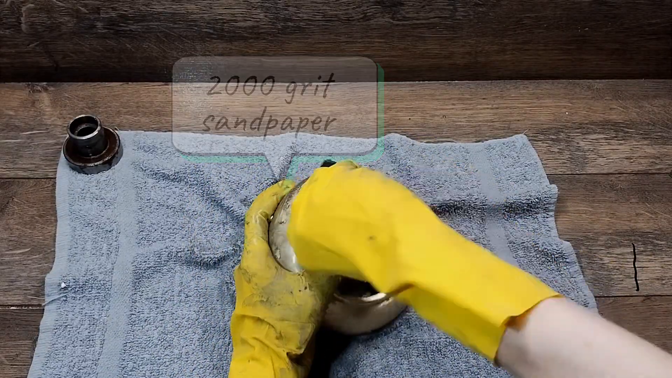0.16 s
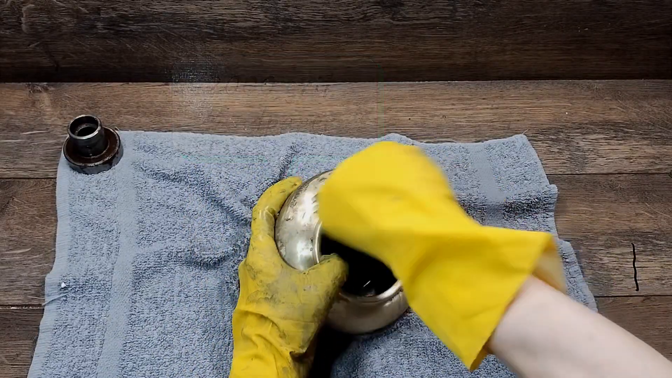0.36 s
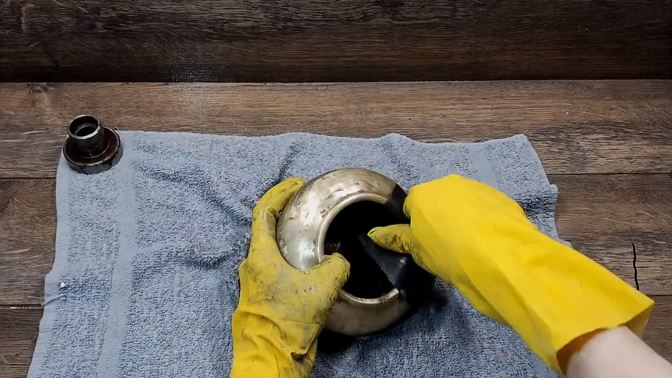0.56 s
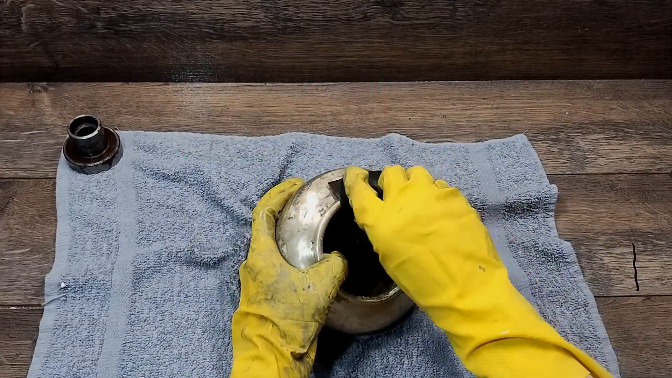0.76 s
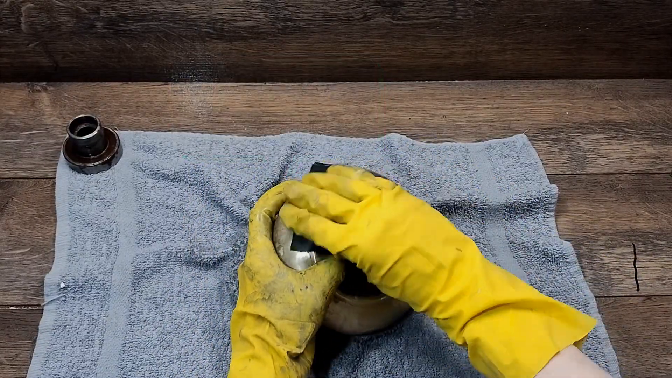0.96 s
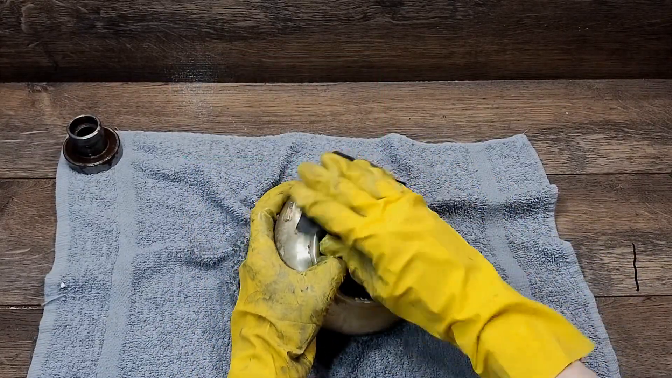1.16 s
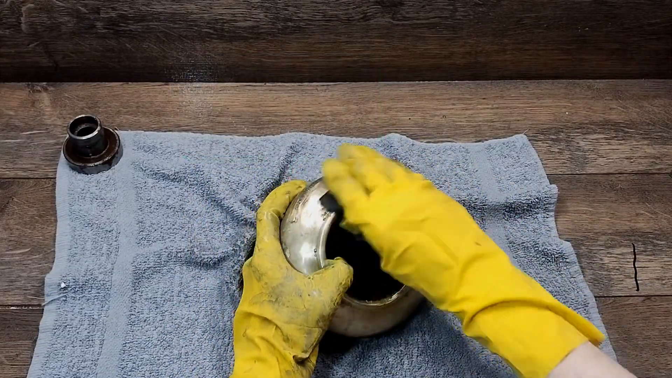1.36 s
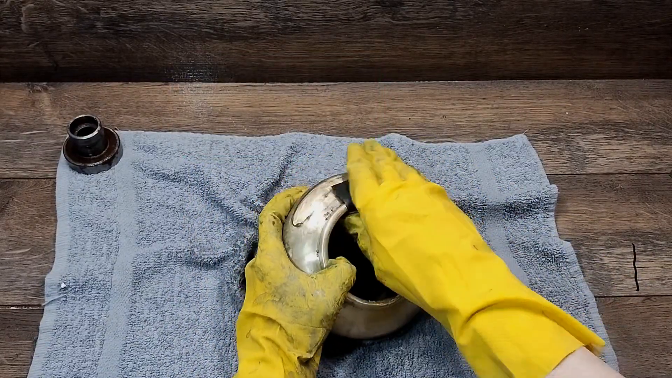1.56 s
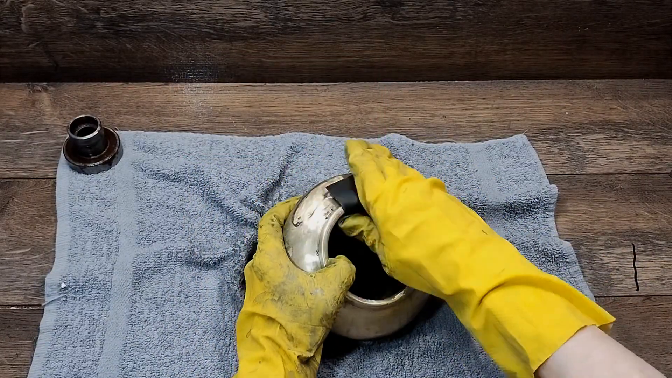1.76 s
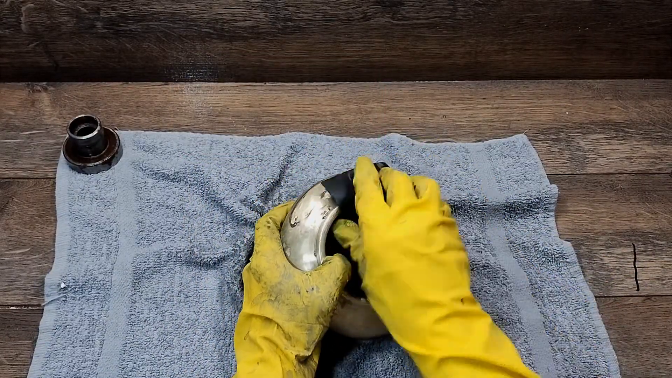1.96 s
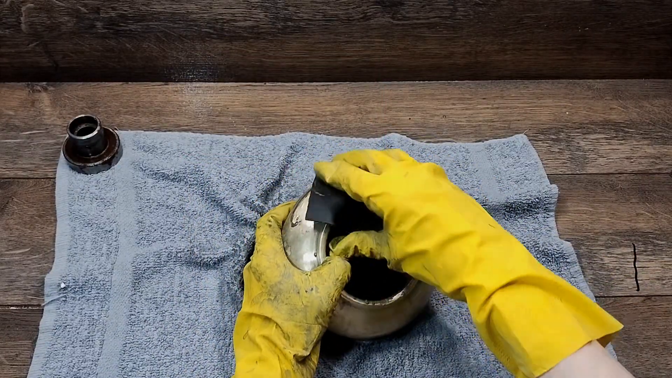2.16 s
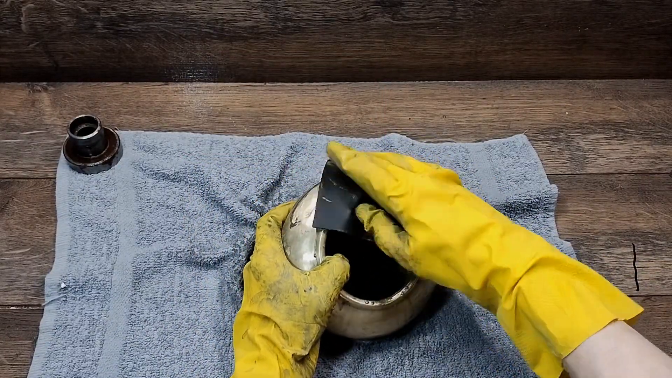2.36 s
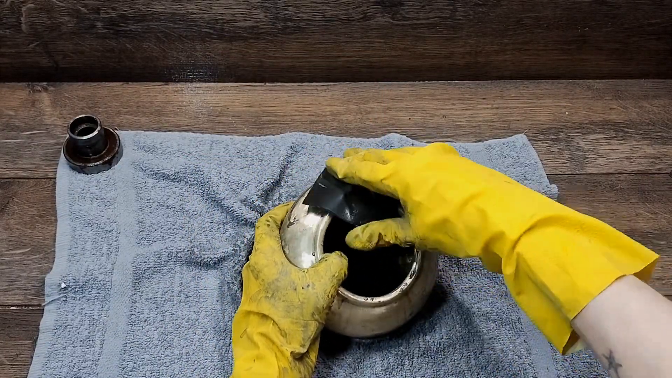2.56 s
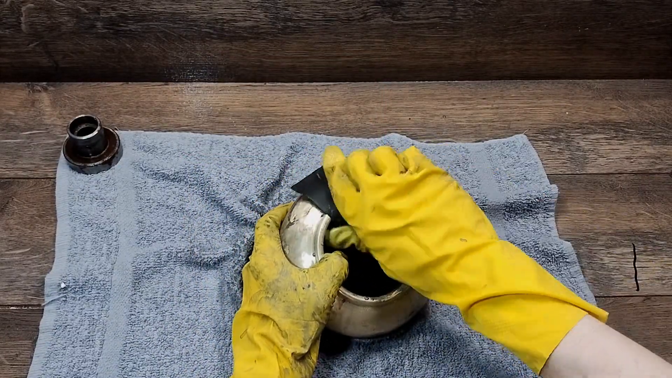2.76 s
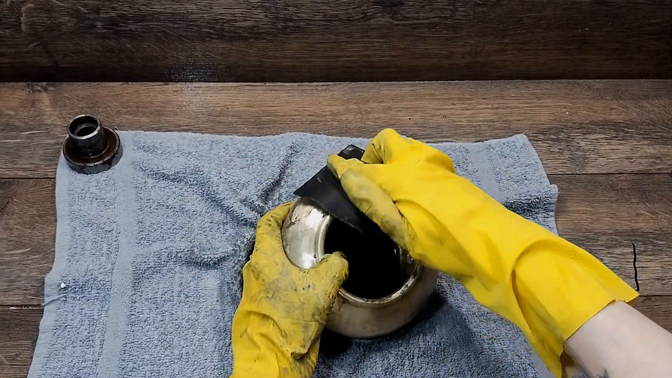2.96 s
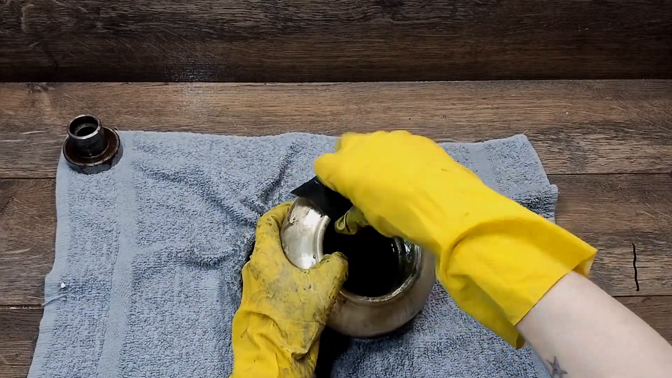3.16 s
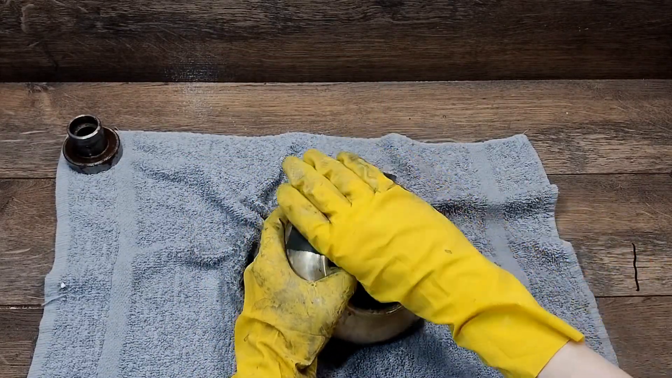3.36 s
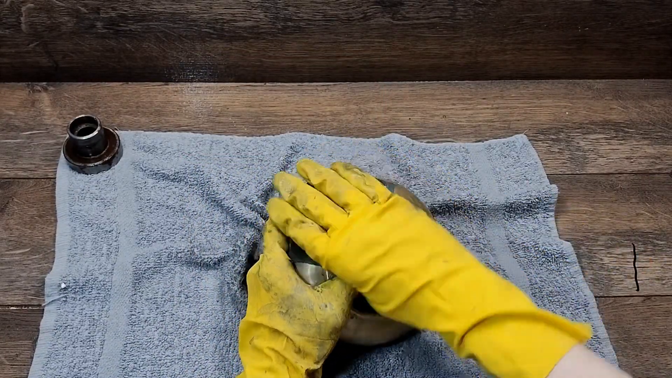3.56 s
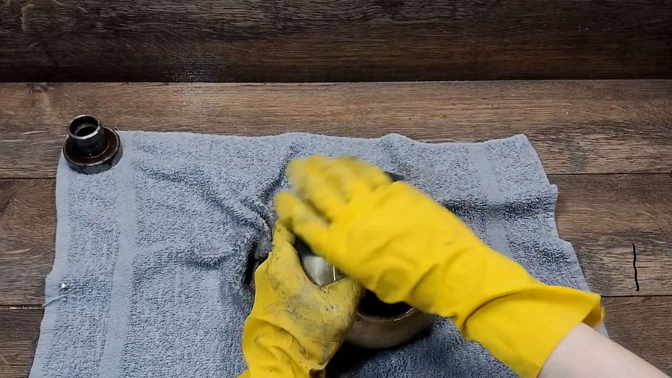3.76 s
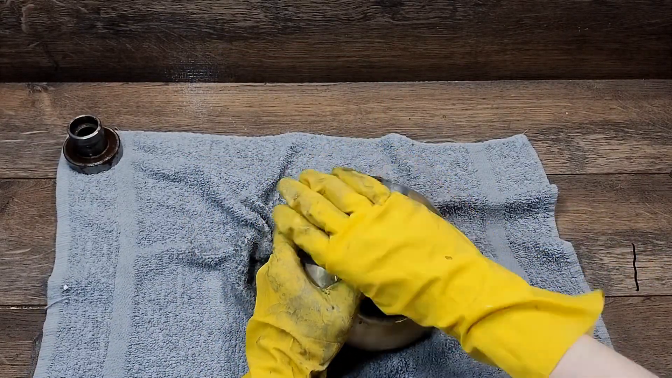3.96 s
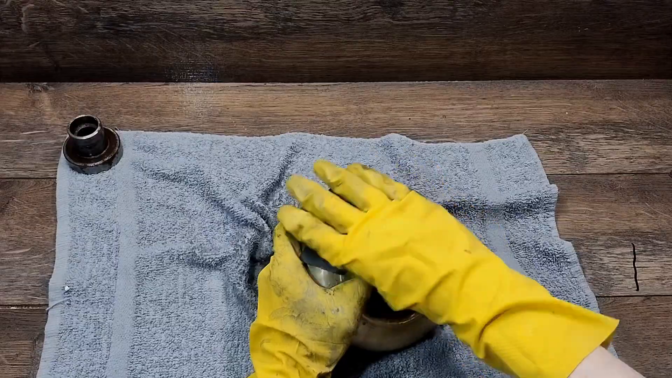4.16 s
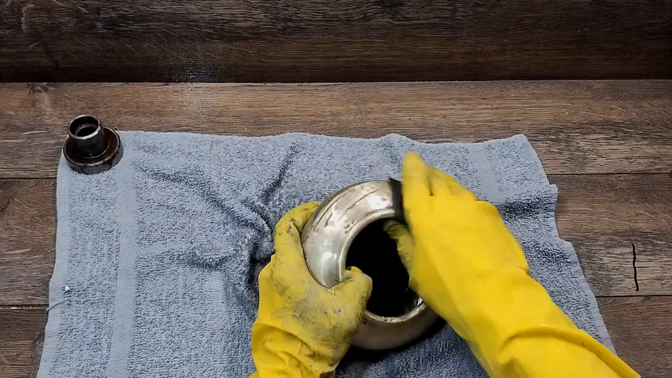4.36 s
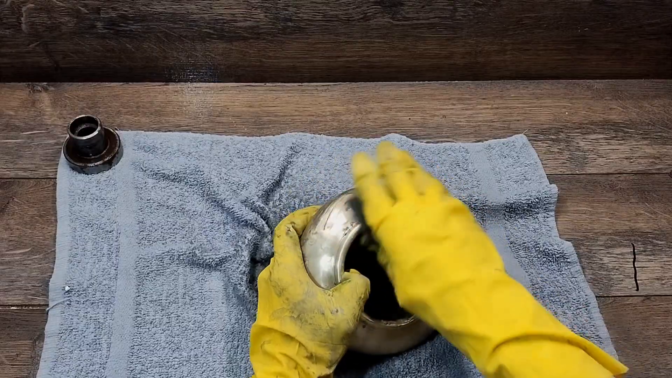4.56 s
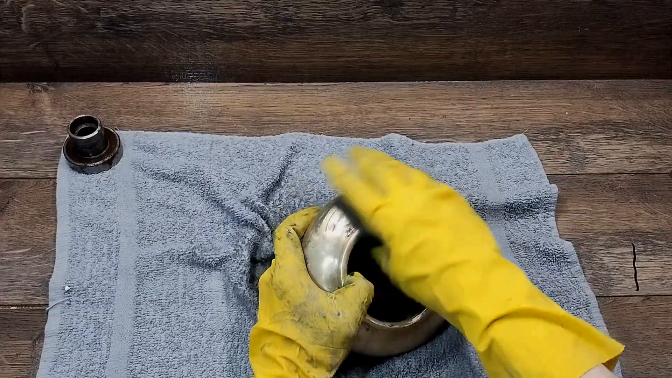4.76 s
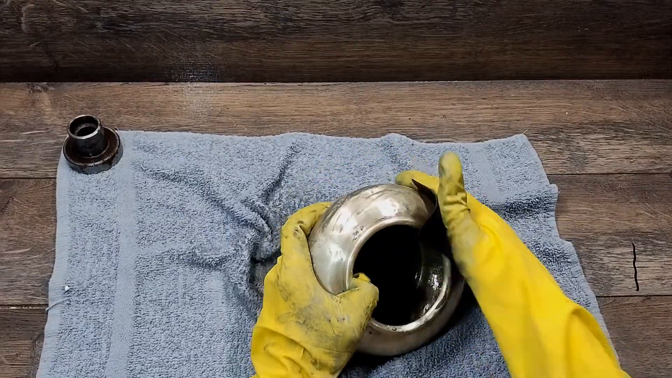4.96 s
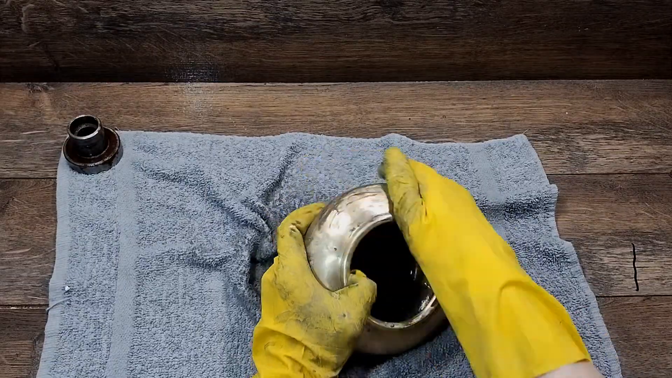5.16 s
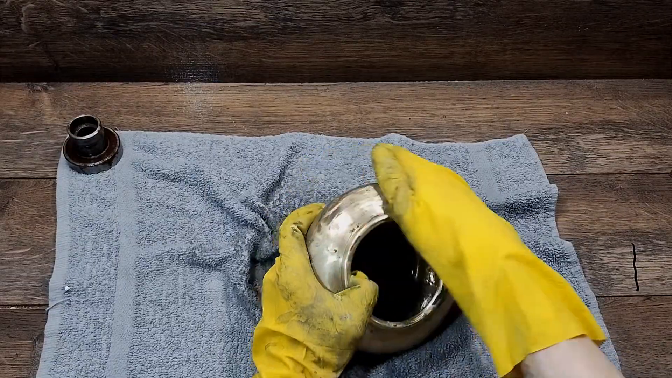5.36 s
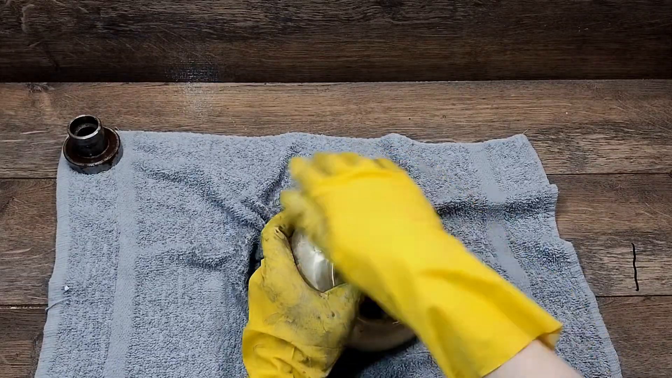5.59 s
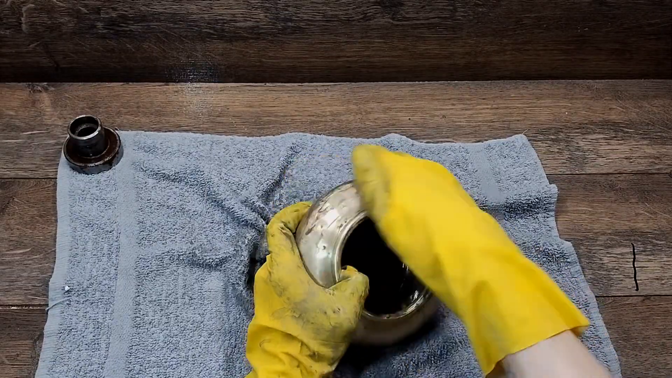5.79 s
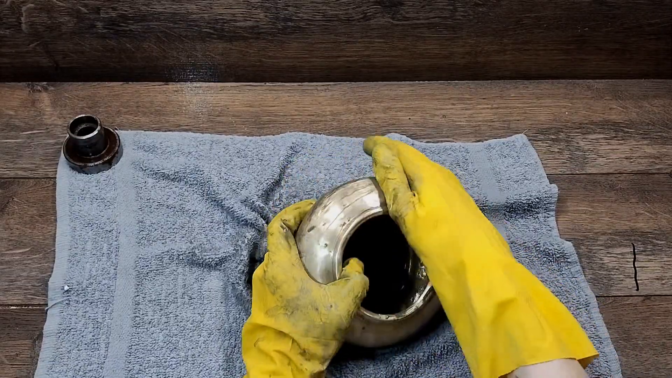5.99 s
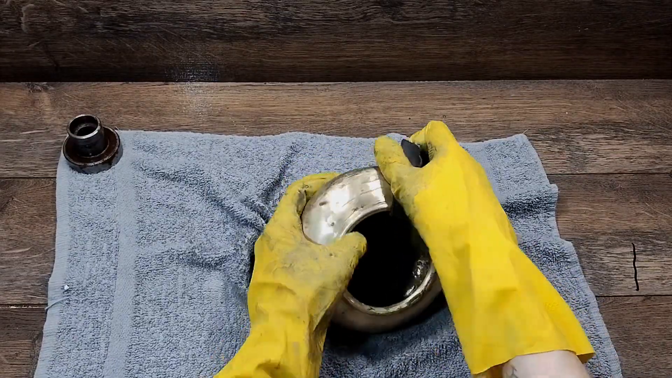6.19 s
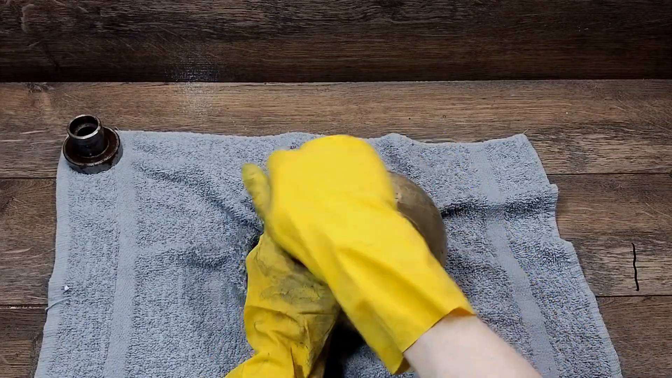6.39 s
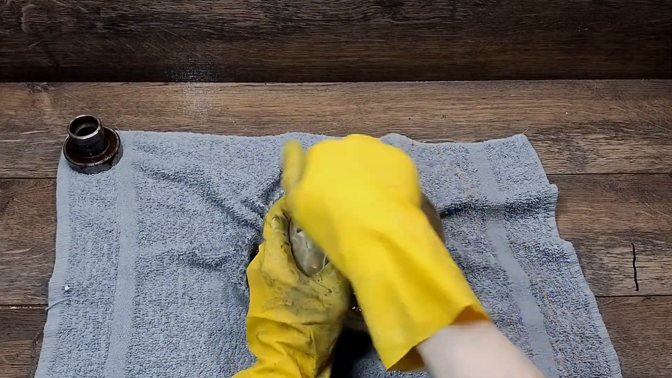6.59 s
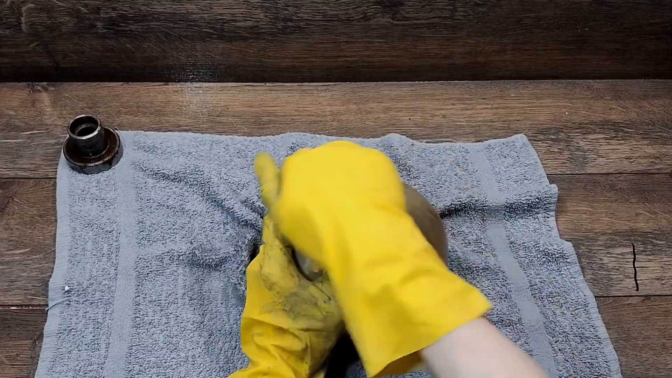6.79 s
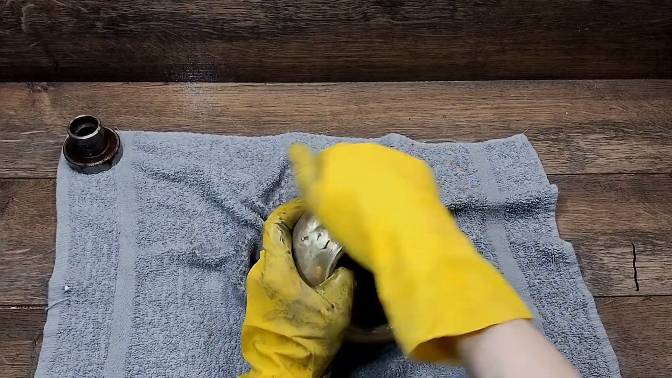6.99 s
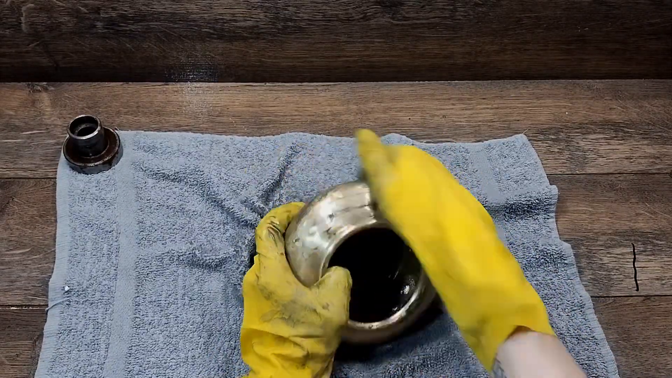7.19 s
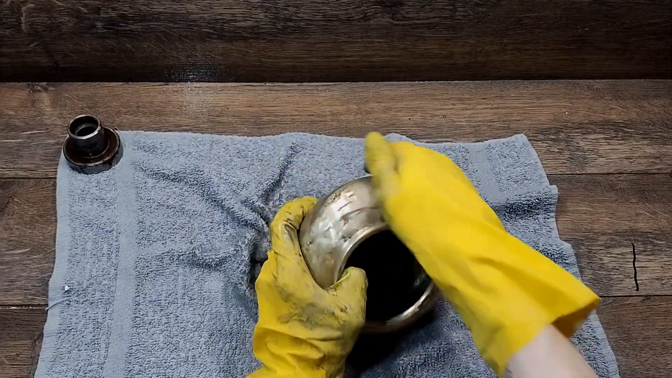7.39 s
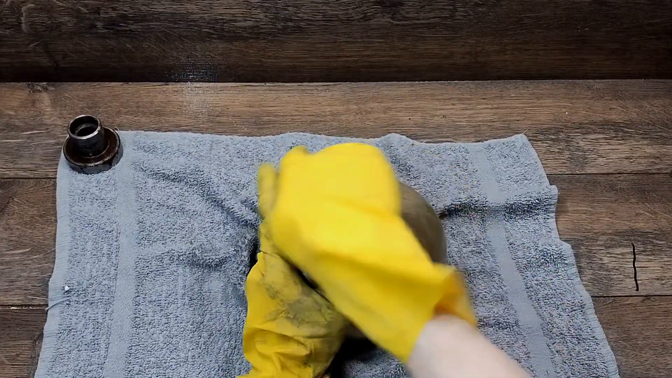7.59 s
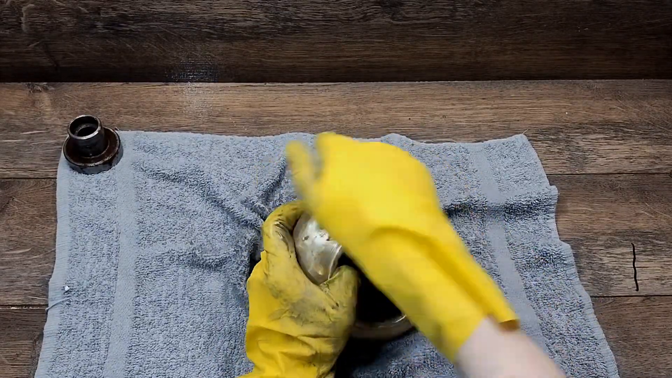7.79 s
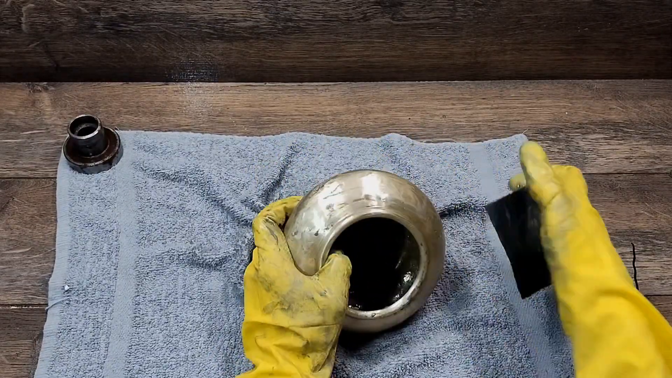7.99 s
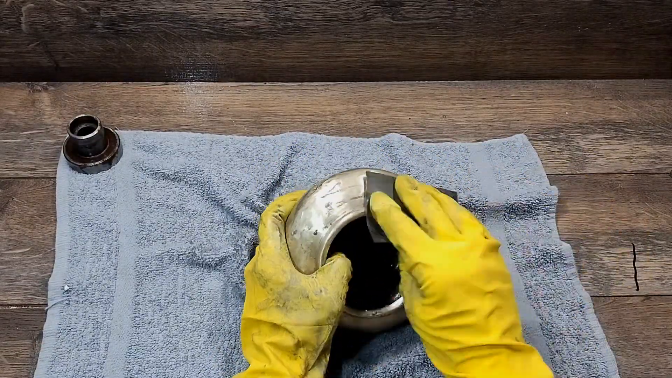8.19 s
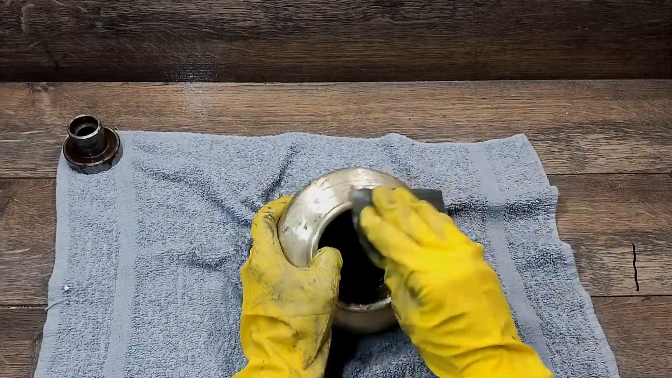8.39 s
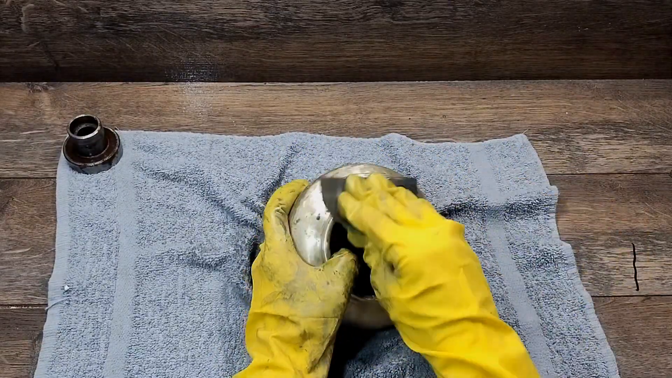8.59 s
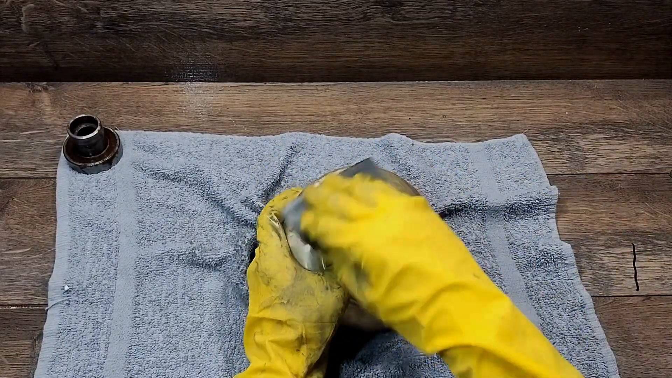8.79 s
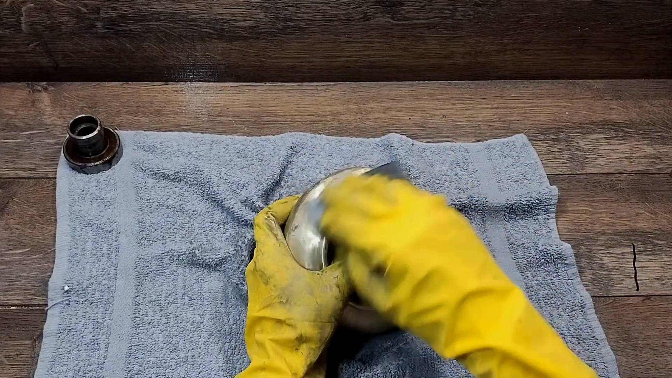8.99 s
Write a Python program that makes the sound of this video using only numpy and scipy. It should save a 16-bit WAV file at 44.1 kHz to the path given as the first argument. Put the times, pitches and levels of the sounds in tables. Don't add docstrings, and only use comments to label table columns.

```python
import sys
import numpy as np
from scipy import signal
from scipy.fft import rfft, irfft, next_fast_len
from scipy.io import wavfile
from scipy.ndimage import uniform_filter1d

SR = 44100
rng = np.random.default_rng(int(sys.argv[2]) if len(sys.argv) > 2 else 0)


def elevation(decibels):
    levels = np.asarray(decibels, float)
    return 10 ** (levels / 20)


def wrap_up_sound(samples):
    columns = np.atleast_2d(samples).T
    tamed = np.clip(columns, -1, 1)
    steps = np.round(tamed * 32767).astype(np.int16)
    wavfile.write(sys.argv[1], SR, steps)


N = 398663


def sanding():
    # start_s, length_s, top_force_db, top_speed_place (0-1)
    first_bout = [(-0.013, 0.088, -36.5, 0.29), (0.069, 0.052, -33, 0.38), (0.099, 0.095, -37.5, 0.27),
                  (0.159, 0.11, -36.5, 0.62), (0.289, 0.13, -41.5, 0.49), (0.394, 0.13, -36, 0.46),
                  (0.515, 0.066, -36.5, 0.36), (0.561, 0.09, -38, 0.08), (0.64, 0.082, -40, 0.33),
                  (0.694, 0.065, -44.5, 0.44), (0.736, 0.052, -51, 0.63), (0.774, 0.056, -50.5, 0.28),
                  (0.806, 0.056, -53.5, 0.4), (0.829, 0.11, -62, 1), (0.915, 0.14, -40, 0.63),
                  (0.995, 0.12, -51, 0.73), (1.094, 0.12, -49.5, 0), (1.181, 0.078, -48, 0.27),
                  (1.223, 0.08, -42.5, 0.42), (1.288, 0.094, -37.5, 0.73), (1.35, 0.078, -40.5, 0.52),
                  (1.417, 0.119, -37, 0.38), (1.527, 0.078, -39.5, 0.38), (1.583, 0.066, -38, 0.26),
                  (1.646, 0.11, -36.5, 0.35), (1.739, 0.071, -37.5, 0.21), (1.792, 0.17, -59.5, 0.03)]
    light_shifts = [(1.907, 0.037, -56.5, 0.35), (1.981, 0.044, -59.5, 0.45), (2.021, 0.094, -53.5, .2),
                    (2.059, 0.056, -44.5, 0.35), (2.102, 0.049, -54.5, 0.53), (1.956, .022, -68, .4),
                    (2.164, 0.052, -63, 0.17), (2.181, 0.092, -59.5, 0.54), (2.243, 0.05, -63, .4),
                    (2.3, .03, -68, .5), (2.326, 0.16, -61.5, 0.08), (2.423, 0.046, -60.5, 0.6),
                    (2.464, 0.057, -65, 0.6), (2.513, .042, -63, .68), (2.561, 0.071, -57.5, 0.84),
                    (2.625, 0.047, -52, .48), (2.722, .033, -66, .53), (2.733, 0.061, -61, .68),
                    (2.791, 0.06, -59, .33), (2.833, 0.037, -56.5, 0.55), (2.919, .056, -66.5, .6),
                    (2.962, .04, -73, .5), (3.015, .035, -85, .5), (3.153, .065, -80, .6),
                    (3.24, .045, -87, .5), (3.28, .055, -79, .2)]
    second_bout = [(3.322, 0.035, -77, .5), (3.351, 0.12, -58, 0.52), (3.442, 0.047, -50, 0.2),
                   (3.473, 0.075, -48.5, 0.35), (3.519, 0.085, -37, 0.12), (3.6, 0.069, -34, 0.53),
                   (3.658, 0.092, -34.5, 0.57), (3.724, 0.072, -43, 0.44), (3.788, 0.088, -35, 0.59),
                   (3.853, 0.16, -37, 0.52), (3.995, 0.093, -34.5, 0.37), (4.071, 0.074, -33, 0.74),
                   (4.119, 0.14, -35.5, 0.69), (4.25, 0.074, -32.5, 0.55), (4.302, 0.1, -34.5, 0.36),
                   (4.389, 0.052, -32.5, 0.73), (4.422, 0.081, -33.5, 0.66), (4.497, 0.066, -31.5, 0.4),
                   (4.537, 0.075, -32.0, 0.38), (4.595, 0.11, -32.5, 0.14), (4.638, 0.059, -33.5, 0.38),
                   (4.682, 0.068, -33, 0.7), (4.724, 0.096, -34.5, 0.58), (4.803, 0.055, -51, 0.53),
                   (4.872, 0.073, -46, 0.52), (4.92, 0.062, -58, 0.8)]
    third_bout = [(5.005, 0.14, -47.5, 0.34), (5.062, 0.1, -37.5, 0.6), (5.108, 0.086, -35.5, 0.46),
                  (5.18, 0.1, -34, 0.47), (5.27, 0.11, -35.5, 0.58), (5.371, 0.089, -33.5, 0.43),
                  (5.448, 0.088, -32.5, 0.52), (5.517, 0.11, -33.5, 0.37), (5.579, 0.1, -32, 0.54),
                  (5.67, 0.082, -33.5, 0.36), (5.728, 0.088, -33.5, 0.57), (5.8, 0.12, -33, 0.23),
                  (5.853, 0.084, -33, 0.65), (5.921, 0.12, -34.5, 0.33), (6.004, 0.055, -48.5, 0.74),
                  (6.052, 0.12, -49.5, 0.51), (6.17, 0.075, -67, 0.9), (6.23, 0.1, -57, 0.12),
                  (6.31, 0.054, -48.5, 0.54), (6.35, 0.12, -51.5, 0.1)]
    fourth_bout = [(6.407, 0.12, -36, 0.47), (6.509, 0.11, -34, 0.4), (6.591, 0.13, -35.5, 0.64),
                   (6.714, 0.083, -33, 0.45), (6.77, 0.12, -33.5, 0.51), (6.88, 0.091, -33.5, 0.44),
                   (6.964, 0.11, -34.5, 0.56), (7.06, 0.089, -34, 0.37), (7.134, 0.094, -34, 0.51),
                   (7.232, 0.072, -34.5, 0.6), (7.255, 0.14, -36.5, 0.83), (7.384, 0.083, -34, 0.5),
                   (7.436, 0.12, -35, 0.56), (7.555, 0.083, -34.5, 0.42), (7.624, 0.097, -34, 0.45),
                   (7.711, 0.085, -34.5, 0.41), (7.767, 0.098, -34.5, 0.56), (7.863, 0.09, -35, 0.33),
                   (7.92, 0.1, -44, 0.45)]
    fifth_bout = [(8.236, 0.066, -52.5, 0.81), (8.295, 0.096, -37, 0.45), (8.386, 0.081, -36, 0.45),
                  (8.447, 0.058, -37.5, 0.53), (8.497, 0.052, -42.0, 0.58), (8.536, 0.058, -38, 0.3),
                  (8.583, 0.042, -41.5, 0.45), (8.613, 0.041, -37.5, 0.42), (8.647, 0.064, -42.5, 0.38),
                  (8.693, 0.052, -38.5, 0.4), (8.731, 0.074, -39, 0.39), (8.804, 0.055, -37, 0.37),
                  (8.826, 0.099, -36.5, 0.56), (8.923, 0.06, -36.5, 0.53), (8.966, 0.059, -35.5, 0.51),
                  (9.016, 0.13, -38, 0.12)]
    further_strokes = [(0.292, 0.048, -36, 0.36), (1.096, 0.052, -37.5, 0.28), (1.795, 0.045, -39.5, 0.43),
                       (3.408, 0.063, -41.5, 0.45), (3.53, 0.041, -34.5, 0.58), (4.822, 0.083, -29.5, 0.43),
                       (4.986, 0.01, -71, 0.3), (6.217, 0.015, -58, .3), (7.258, .035, -40, .25),
                       (2.334, 0.032, -54.5, 0.5), (7.293, 0.043, -39.5, 0.53), (3.088, 0.06, -76, 0.3),
                       (8.02, 0.15, -85, 0.4), (8.186, .02, -79, .4), (8.23, 0.027, -66, 0.25),
                       (1.882, .02, -56, 0.4)]
    # pitch_hz, level_db (per Hz)
    fizz_colour = [(3000, -26.5), (4400, -3.5), (5400, -2), (7500, -3), (8600, -0.5), (10200, -1),
                   (13900, -6.5), (16000, -7.5)]
    airy_colour = [(3300, -30), (4200, -11), (7600, -10), (8100, -1), (9000, 0), (12000, -4), (16000, -8)]
    wall_colour = [(1700, -35.5), (2100, -11.5), (2500, -3.5), (2800, -0.5), (3300, 1), (4400, -3),
                   (6500, -35)]
    # pitch_hz, width_hz, level_db
    wall_modes = [(2800, 260, -17), (3350, 320, -18), (3900, 320, -18)]
    rim_modes = [(2200, 310, 2.5), (2326, 110, 3.5)]
    belly_modes = [(1170, 620, -2.5), (1480, 190, 3.5), (2030, 860, 15)]
    rim_colour = [(1900, -13.0), (2100, 1.5), (2400, 4), (2650, -12)]
    belly_colour = [(700, -64), (950, 3.0), (2000, 4.5), (2400, -1)]

    wall_db, rim_db, belly_db, shoulder_db = places()
    rows = [*first_bout, *light_shifts, *second_bout, *third_bout, *fourth_bout, *fifth_bout, *further_strokes]
    fizz, wall = strokes(rows, wall_db)
    bite = np.clip((20 * np.log10(fizz + 1e-9) + 62) / 16, 0, 1)

    grains = patchy(grit(per_s=40000, spread_db=0.5, clump_db=1.0))
    drive = patchy(evened(grit(per_s=16000, spread_db=0.5, clump_db=0.3)))
    scratch = bite * heard(grains, fizz_colour) + (1 - bite) * heard(grains, airy_colour)
    hiss = elevation(0.49) * fizz * scratch

    body = heard(drive + ring(drive, wall_modes, 0.039, waver_db=2.0), wall_colour)
    body = body + (elevation(shoulder_db) - 1) * resonate(body, 2950, 1500)
    body = body - 0.65 * (1 - bite) * resonate(body, 3950, 1700)
    rim = heard(ring(drive, rim_modes, 0.0035, waver_db=-2.0), rim_colour)
    belly = heard(ring(drive, belly_modes, 0.016, waver_db=2.5), belly_colour)
    pot = elevation(0.96) * body + elevation(rim_db - 11.5) * rim + elevation(belly_db - 6.0) * belly
    rub = hiss + wall * pot

    shade_hz = 3113 * (1 + 0.13 * drift(per_s=7))
    return rub - 0.56 * resonate(rub, shade_hz, 150)


def strokes(rows, place_db):
    stick = 0.12
    rise_arch, fall_arch = 1.65, 3.07
    plateau = 0.86
    firm_db, wall_per_db = -34, -0.45
    t, fizz, wall = np.arange(N) / SR, np.zeros(N), np.zeros(N)
    for s, length, force_db, top in rows:
        span = slice(max(round(s * SR), 0), round((s + length) * SR))
        done = np.clip((t[span] - s) / length, 0, 1)
        top = np.clip(top, .05, .95)
        rise = np.maximum(done / top - stick, 0) / (1 - stick)
        fall = (1 - done) / (1 - top)
        arch = np.sin(np.pi / 2 * np.minimum(rise, fall))
        speed = arch ** np.where(done < top, rise_arch, fall_arch)
        speed = np.tanh(plateau * speed) / np.tanh(plateau)
        fizz[span] += (elevation(force_db) * speed) ** 2
        wall[span] += (elevation(force_db + wall_per_db * (force_db - firm_db)) * speed) ** 2
    fizz = fizz + 0.041 * lingering(fizz, 0.01)
    wall = 0.75 * wall + 0.29 * lingering(wall, 0.011)
    return np.sqrt(fizz), elevation(place_db) * np.sqrt(wall)


def lingering(power, decay_s):
    keep = np.exp(-1 / (decay_s * SR))
    return signal.lfilter([1 - keep], [1, -keep], power)


def places():
    # from_s, wall_over_fizz_db, rim_over_wall_db, belly_over_wall_db, shoulder_db
    parts = [(0, -8, -9, -8.5, 0.5), (.17, -6, 0, -15, -1.5), (.29, -5.5, -5, -16, -3.5),
             (.45, -6.5, -6, -6, -6.5), (.52, -5, -2.5, -10, -2.5), (.74, -14, -2, -2, 2),
             (.93, -11, -2, -5, 1), (1.08, -9, 2, -10, -5), (1.18, -9, 9, -10, -1.5),
             (1.42, -7.5, -5, -9.5, -2.5), (1.64, -7, -1.5, -10, -2.5), (1.9, -19, 2, -1, 3.5),
             (2.4, -18, -1, -1.5, 4), (3.3, -11, -6, -5.5, -1), (3.48, -9, -8, -11, -3.5),
             (3.6, -4, -10, -13, -5), (3.86, -6.5, -2, -4.5, -1), (4.12, -6.5, -6, -7.5, -1.5),
             (4.4, -8, -12, -5, -3), (4.68, -6, -14, -8.5, -5.5), (4.82, -7.5, -10.5, -10, -8.5),
             (4.5, -6, -14, -7, -4.5), (4.93, -16, -4, -5, -6), (5.0, -6.5, -11, -12.5, -1),
             (5.4, -6.5, -9, -9.5, -2.5), (5.7, -7, -18, -9.5, -1), (6.0, -11, -4, -1, 1),
             (6.16, -12.5, -2, 2, 0.5), (6.4, -9.5, -7, -9.5, 0.5), (6.9, -9, -4.5, -12, -0.5),
             (7.4, -9, -7, -18, -1), (7.7, -9, -15, -27, -0.5), (7.86, -10, -12, -27, 1.5),
             (7.93, -8.5, -1, -18, -2.5), (8.15, -10, -21, -12, -6), (8.39, -8.5, -13, -9.5, -5.5),
             (8.6, -8, -2, -6.5, -5.5), (8.8, -6.5, -14, -7, -7.5), (8.92, -6, -8, -6.5, -6.5)]
    turn_s = 0.06
    s, *columns = np.transpose(parts)
    row = np.clip(np.searchsorted(s, np.arange(N) / SR, "right") - 1, 0, None)
    return [uniform_filter1d(c[row], round(turn_s * SR)) for c in columns]


def grit(per_s, spread_db, clump_db):
    uneven_db = spread_db * np.minimum(rng.exponential(1, N), 4)
    size = elevation(uneven_db + clump_db * drift(per_s=150))
    return size * (rng.random(N) < per_s / SR) * rng.standard_normal((2, N))


def patchy(x):
    patch_db, patch_hz, patch_s = 1.6, 260, .035
    z = signal.stft(x, nperseg=512, noverlap=384)[2]
    field = rng.standard_normal(z.shape[1:])
    field = uniform_filter1d(field, round(patch_hz * 512 / SR), 0)
    field = evened(uniform_filter1d(field, round(patch_s * SR / 128), 1))
    return signal.istft(z * elevation(patch_db * field + 6.5), nperseg=512, noverlap=384)[1][:, :N]


def ring(drive, modes, shift, waver_db):
    total = 0
    for hz, width, db in modes:
        level = elevation(db + waver_db * drift(per_s=12))
        total = total + level * evened(resonate(drive, hz * (1 + shift * drift(per_s=8)), width))
    return total


def knocks():
    # start_s, peak_db, air_pitch_hz, left_minus_right_db
    finger_knocks = [(0.077, -47, 490, 1), (0.679, -49, 510, 0.0), (1.065, -45.5, 476, -1),
                     (2.07, -52, 490, -2), (2.221, -55, 356, -4), (2.37, -53, 463, 0),
                     (2.977, -55, 375, -2), (3.688, -46, 387, 0.5), (4.122, -47, 464, -6.5),
                     (4.422, -41.5, 470, 0.5), (4.467, -49, 396, -4), (4.482, -44, 405, -7),
                     (4.495, -46, 423, -4), (4.551, -50, 528, 0), (4.564, -46, 479, -1),
                     (4.805, -48, 402, -3), (4.72, -45, 456, 0), (4.616, -41.5, 455, 0),
                     (4.695, -48, 373, 0.0), (4.793, -40, 360, -8), (4.857, -43.5, 440, -1.0),
                     (8.332, -50, 417, -1.5), (8.577, -47, 426, -10), (8.603, -41, 424, 2),
                     (8.507, -50, 484, -3), (8.55, -51, 466, -3), (8.637, -50, 443, -9),
                     (8.665, -37.5, 542, 3), (8.675, -26.5, 418, -7), (8.812, -44.5, 506, -2),
                     (8.887, -52, 460, -3), (8.749, -42.5, 422, -8), (8.794, -42, 448, -2.5),
                     (8.995, -46, 477, -0.5), (8.065, -49, 270, 0), (8.212, -49, 200, 0)]
    out, t = np.zeros((2, N)), np.arange(4000) / SR
    swell = (t / 0.0055) ** 2 * np.exp(2 - 2 * t / 0.0072)
    for s, db, hz, pan_db in finger_knocks:
        sides_db = np.array([[pan_db / 2], [-pan_db / 2]])
        add(out, s - .004, elevation(db - 7.0 + sides_db) * np.sin(2 * np.pi * hz * t) * swell)
    return out


def ticks():
    # start_s, peak_db, pitch_hz
    paper_ticks = [
        (2.226, -69, 2400),
        (2.525, -57, 2420),
        (2.855, -64, 3420),
        (2.443, -50.5, 2400),
        (3.094, -62, 3400),
        (6.217, -53, 2300),
        (8.052, -47, 1700),
        (8.666, -36, 985),
        (8.667, -41, 2580),
    ]
    out, t = np.zeros((2, N)), np.arange(4000) / SR
    for s, db, hz in paper_ticks:
        add(out, s, elevation(db) * whistle(len(t), hz, 1200) * np.exp(-t / 0.0066))
    return out


def squeaks():
    # start_s, length_s, pitch_hz, width_hz, level_db
    glove_squeaks = [
        (2.22, 0.14, 2860, 170, -61),
        (2.606, 0.024, 3290, 500, -56),
        (2.636, 0.026, 3260, 600, -52),
    ]
    out = np.zeros((2, N))
    for s, length, hz, width_hz, db in glove_squeaks:
        sound = whistle(round(length * SR), hz, width_hz)
        add(out, s, elevation(db) * sound * signal.windows.tukey(sound.shape[1], .4))
    return out


def whistle(count, hz, width):
    return evened(resonate(resonate(hush(count), hz, width), hz, width))


def pot_air():
    nudges = grit(per_s=900, spread_db=3.5, clump_db=0.2)
    pitch_hz = 460 * (1 + 0.064 * drift(per_s=11.0))
    return heard(resonate(nudges, pitch_hz, 99), [(200, -23), (350, 2.5), (550, -0.5), (800, 0)])


def background():
    # start_s, handling_db, fingers_on_pot_db, table_hum_db
    levels = [(0.0, -64, -64.5, -54.5), (0.45, -62, -63, -59), (0.78, -67, -65, -59.5),
              (1.79, -63.5, -69.5, -57.5), (2.04, -69, -67, -61), (2.5, -69.5, -68, -57),
              (3.1, -76.5, -78, -64.5), (3.4, -72.5, -73, -60), (3.75, -65.5, -64, -57),
              (4.66, -59.5, -63.5, -60), (4.96, -63.5, -73, -56.5), (5.46, -65, -78, -61),
              (6.42, -66.5, -69, -59), (7.83, -65.5, -72.5, -60), (8.08, -70.5, -79, -60),
              (8.28, -69.5, -74, -60), (8.66, -63, -58, -61), (9.04, -65, -68, -62)]
    # pitch_hz, level_db (per Hz)
    hum_colour = [(12, -44), (20, -38), (49, -25), (145, -8), (252, -4), (331, -11.5), (400, -11),
                  (560, -59)]
    rustle_colour = [(400, 0), (780, -3.5), (980, 0), (1250, -2.5), (2500, -1.5), (3150, -7), (3700, -13.5),
                     (15000, -29)]
    creak_colour = [(30, -30), (60, -4), (110, 0), (170, 2), (260, -30)]
    room_colour = [(450, -15), (650, 2.5), (1000, 0), (1200, -19)]
    rustle_db, air_db, hum_db = curves(levels)
    jostle_db = drift(per_s=40)
    hum = elevation(hum_db - 0.5 + jostle_db) * heard(hush(N), hum_colour)
    air = elevation(air_db + 3.5 + jostle_db) * pot_air()
    rustle = elevation(rustle_db + 5.5 + 1.98 * jostle_db) * heard(hush(N), rustle_colour)
    creak_db = 2.6 * (rustle_db + 62) - 65.0 + 1.5 * jostle_db
    creak = elevation(creak_db) * heard(hush(N), creak_colour)
    room = elevation(-73 + jostle_db) * heard(hush(N), room_colour)
    return hum + air + rustle + creak + room


def heard(pair, spectrum):
    # pitch_hz, left_minus_right_db
    facing = [(60, 0.5), (130, -1), (290, 0.0), (640, 0.5), (1400, -1), (3090, 2.5), (7500, -10.5),
              (15000, -8.5)]
    # pitch_hz, likeness (0-1)
    likeness = [(60, 0.92), (130, 0.96), (290, 0.93), (640, 0.42), (1400, 0.061), (3090, 0.29),
                (6800, 0.011), (15000, 0.02)]
    size = next_fast_len(N)
    hz = np.fft.rfftfreq(size, 1 / SR)
    left, other = rfft(pair, size)
    same = np.clip(read(likeness, hz), 0, 1)
    tilt = elevation(read(facing, hz) / 2)
    right = same * left + np.sqrt(1 - same ** 2) * other
    both = np.array([left * tilt, right / tilt])
    out = irfft(both * elevation(read(spectrum, hz)), size)[:, :N]
    return out / np.sqrt(np.mean(out.mean(0) ** 2))


def resonate(x, hz, width):
    turn = np.exp(2j * np.pi * np.cumsum(hz * np.ones(x.shape[-1])) / SR)
    r = np.exp(-np.pi * width / SR)
    return 2 * (turn * signal.lfilter([1 - r], [1, -r], x / turn)).real


def hush(count):
    return rng.standard_normal((2, count))


def drift(per_s):
    knots = rng.standard_normal(int(N / SR * per_s) + 2)
    return evened(np.interp(np.linspace(0, len(knots) - 1, N), np.arange(len(knots)), knots))


def evened(x):
    return x / np.sqrt(np.mean(x ** 2) + 1e-20)


def read(points, hz):
    f, value = np.transpose(points)
    return np.interp(np.log(hz + 1), np.log(f + 1), value)


def curves(rows):
    s, *columns = np.transpose(rows)
    return [np.interp(np.arange(N) / SR, s, c) for c in columns]


def add(mix, s, sound):
    part = mix[..., round(s * SR):][..., :sound.shape[-1]]
    part += sound[..., :part.shape[-1]]


def scene():
    return sanding() + background() + knocks() + ticks() + squeaks()


def thinned(x):
    # start_s, length_s, pitch_hz
    holes = [(0.403, 0.11, 1809), (0.97, 0.044, 2584), (1.109, 0.042, 2580), (1.185, 0.044, 2620),
             (1.316, 0.051, 1752), (1.755, 0.04, 3480), (1.805, 0.056, 3761), (2.058, 0.046, 3100),
             (2.173, 0.04, 6345), (2.197, 0.088, 4393), (2.23, 0.097, 4996), (2.393, 0.064, 5053),
             (2.476, 0.066, 4967), (2.565, 0.055, 4364), (2.791, 0.049, 3991), (2.935, 0.037, 4565),
             (2.95, 0.051, 5398), (3.275, 0.04, 5283), (3.305, 0.04, 4537), (3.46, 0.06, 3245),
             (4.113, 0.042, 1723), (4.714, 0.04, 3015), (4.938, 0.04, 4480), (5.145, 0.04, 3589),
             (5.23, 0.043, 2986), (5.473, 0.053, 4700), (5.93, 0.044, 4364), (7.089, 0.04, 1838),
             (7.165, 0.055, 2785), (7.74, 0.049, 4651), (8.324, 0.038, 3216), (8.329, 0.073, 2756),
             (8.395, 0.051, 2670), (8.499, 0.041, 3101), (8.514, 0.046, 3750), (8.608, 0.042, 3187),
             (8.739, 0.044, 2613), (8.808, 0.045, 3446), (8.867, 0.049, 3360), (8.972, 0.046, 3675),
             (8.976, 0.042, 5000), (2.81, 0.03, 6000), (8.05, 0.04, 5000), (7.887, 0.04, 1950),
             (7.887, 0.037, 1420), (0.53, 0.13, 1700), (1.15, 0.04, 4550), (8.535, 0.04, 2950),
             (2.44, 0.03, 3650)]
    hole_hz, hole_db = 180, -21
    hz, t, z = signal.stft(x, SR, nperseg=1024, noverlap=768)
    power = uniform_filter1d((abs(z) ** 2).sum(0), size=5, axis=1) + 1e-20
    near = uniform_filter1d(power, size=3, axis=0)
    around = uniform_filter1d(power, size=25, axis=0)
    dip_db = 10 * np.log10(near / around)
    cut_db = 0.46 * np.minimum(dip_db + 3, 0) * (hz[:, None] > 700)
    for s, length, mid_hz in holes:
        band = np.exp(-((hz - mid_hz) / hole_hz * 2) ** 4)
        moment = abs(t - s - length / 2) < length / 2
        cut_db = cut_db + hole_db * np.outer(band, moment)
    return signal.istft(z * elevation(cut_db), SR, nperseg=1024, noverlap=768)[1][:, :N]


def low_pass(x):
    return signal.sosfilt(signal.butter(12, 15550, fs=SR, output="sos"), x)


def record(dry):
    edge = signal.firwin(901, 14310, window=("kaiser", 10), fs=SR)
    finished = signal.oaconvolve(thinned(dry), edge[None], "same")
    return low_pass(finished)


dry = scene()
out = record(dry)
wrap_up_sound(out)
```